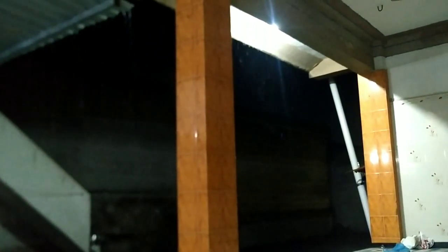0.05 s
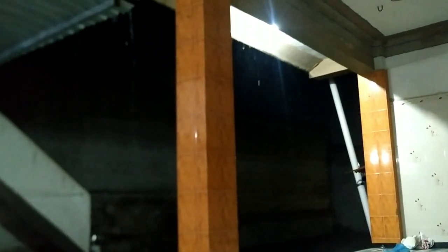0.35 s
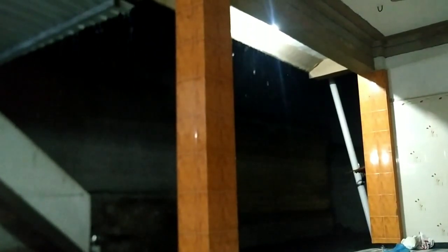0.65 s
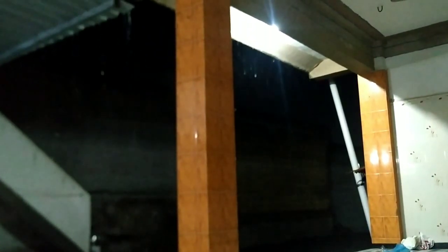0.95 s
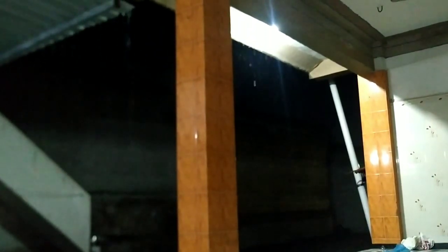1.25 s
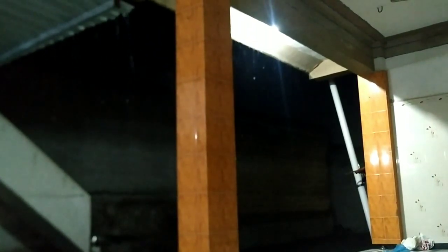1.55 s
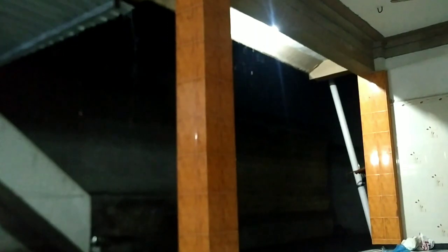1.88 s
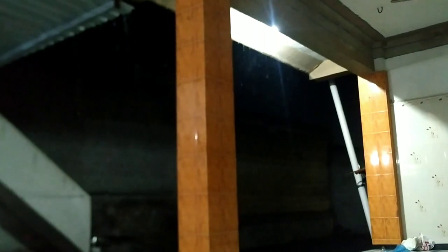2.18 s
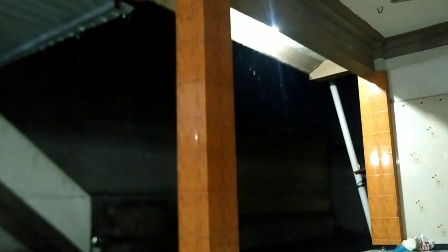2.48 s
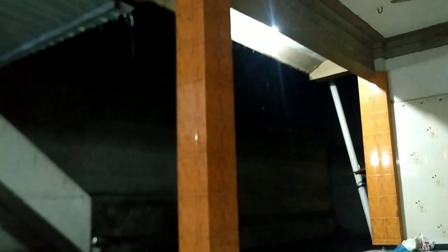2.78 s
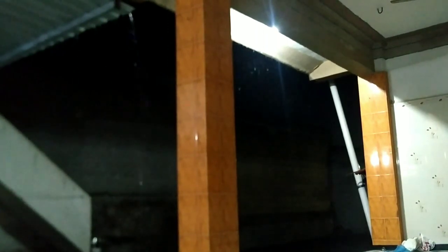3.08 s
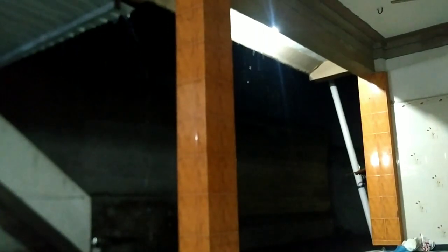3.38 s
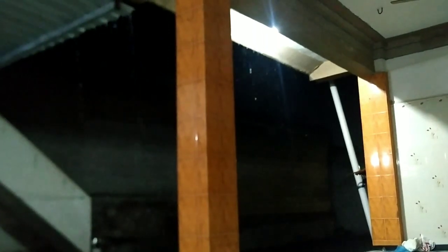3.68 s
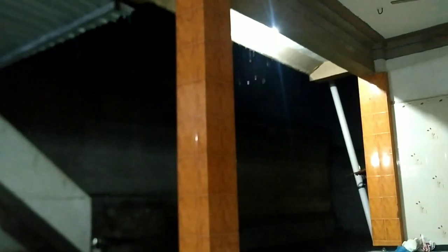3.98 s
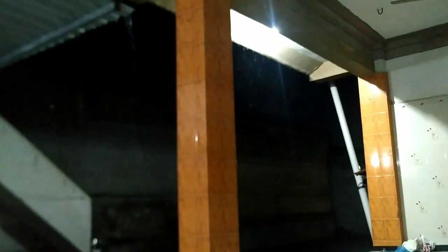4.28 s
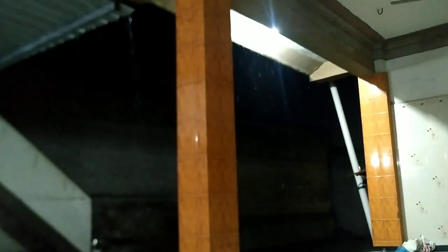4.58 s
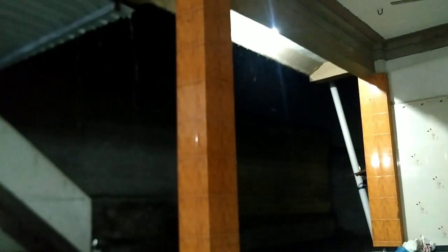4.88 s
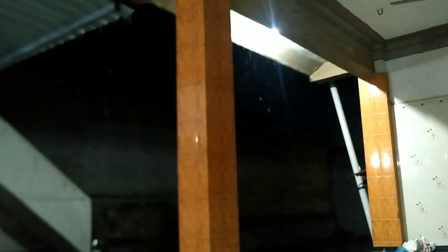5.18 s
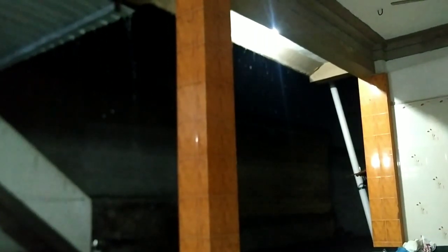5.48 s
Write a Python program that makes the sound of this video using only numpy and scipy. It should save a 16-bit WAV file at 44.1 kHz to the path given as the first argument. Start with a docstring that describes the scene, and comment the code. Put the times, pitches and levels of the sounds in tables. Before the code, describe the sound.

Heavy rain falls throughout on a flooded paved yard, heard from under the porch of a house. A bright, bubbling sizzle sits mostly to the left, while separate drips stand out on the right. Water off the eaves lands in short gushes, with tiny squeaky chirps on both sides. Rain on the surrounding roofs makes a dull roar with a faint low drone. The downpour eases slightly, then picks up again.

```python
"""A flooded paved yard in heavy rain, heard from under the porch of a house.
Countless drops burst on the wet paving and trap ringing bubbles: a bright sizzle, mostly to the left.
Water spilling off the eaves lands in gushes. Brief, squeaky narrow-band chirps sound on either side.
Impacts on the roofs all around merge into a roar, in which hollow surfaces briefly resonate,
and a low drone swells now and then beneath it."""
import sys
import numpy as np
from scipy import signal
from scipy.fft import rfft, irfft
from scipy.io import wavfile

SR = 44100
rng = np.random.default_rng(int(sys.argv[2]) if len(sys.argv) > 2 else 0)


def generate_wav(sig):
    """Save sig (samples, or channels by samples) to the path in sys.argv[1] as 16-bit PCM at SR."""
    pcm = np.round(np.clip(np.atleast_2d(sig).T, -1, 1) * 32767).astype(np.int16)
    wavfile.write(sys.argv[1], SR, pcm)


N = 249165
TIME = np.arange(N) / SR
FREQS = np.maximum(np.arange(N // 2 + 1) * SR / N, 1)


def from_db(db):
    """Amplitude ratio of a level in decibels."""
    return 10 ** (np.asarray(db) / 20)


def rms_one(x):
    """Normalisation to an rms of one."""
    return x / np.sqrt(np.mean(x ** 2) + 1e-20)


def over_freqs(rows):
    """Interpolation of a table's columns along a log-frequency axis."""
    hz, *columns = np.transpose(rows)
    return np.array([np.interp(np.log(FREQS), np.log(hz), c) for c in columns])


def colour(sound, gain):
    """Linear filtering: the spectrum is multiplied by a gain at each frequency."""
    return irfft(rfft(sound) * gain, N)


def density(rows):
    """Gains that give white noise of rms one a tabulated power spectral density."""
    return from_db(over_freqs(rows)) * np.sqrt(SR / 2)


def drift(rate_hz):
    """Slow random fluctuation: low-passed noise of rms one."""
    return rms_one(colour(rng.standard_normal(N), 1 / (1 + (FREQS / rate_hz) ** 2)))


def swell(peak_s, half_length_s):
    """A raised-cosine envelope."""
    return np.cos(np.pi / 2 * np.clip((TIME - peak_s) / half_length_s, -1, 1)) ** 2


def place(start_s, sounds):
    """Superposition of short sounds at their start times."""
    at = (start_s * SR).astype(int)[:, None] + np.arange(sounds.shape[1])
    return np.bincount(at.ravel() % N, sounds.ravel(), N)


def narrow_bursts(hz, width_hz, rise_s, fall_s, samples=4096):
    """Noise-excited resonance: for each pitch, a burst of noise rings in a narrow band."""
    age = np.arange(samples) / SR
    envelope = np.minimum(age / rise_s, 1) * np.exp(-np.maximum(age - rise_s, 0) / fall_s)
    detuning_hz = np.arange(samples // 2 + 1) * SR / samples - hz[:, None]
    resonance = 1 / (1 + 2j * detuning_hz / width_hz) ** 2
    bursts = irfft(rfft(envelope * rng.standard_normal((len(hz), samples))) * resonance)
    return bursts * np.sqrt(np.sum(envelope ** 2) / np.sum(bursts ** 2, axis=1, keepdims=True))


def splash(flutter_db=0.34, patchy_db=0.8):
    """Incoherent sources add in power: spray, drops, bubbles and gushes sizzle on the paving."""
    # spectrum of drops bursting on wet paving: frequency_hz, left_db_per_hz, right_db_per_hz
    spectrum = [(960, -82, -80), (1800, -67.5, -59), (2060, -64, -62), (3100, -59.5, -60),
                (3260, -60.5, -61), (4230, -60, -66.5), (5000, -59, -67.5), (5500, -60, -71.5),
                (7200, -58.5, -71.5), (9500, -59.5, -71), (10800, -62.5, -73.5), (12600, -67.5, -82),
                (14000, -73.5, -79), (15000, -96, -92)]
    # dripping on the right, heaviest at first: time_s, level_db
    dripping = [(0, 2), (0.2, 9), (0.65, 1.5), (0.97, 5), (1.3, -2), (2.4, 3), (3.3, -3), (5.65, 1)]
    sizzle = (from_db(-3) * rng.standard_normal((2, N))  # fine spray
              + from_db(-2.5) * impacts(per_s=7000, spread_db=1.5)  # dense drops
              + from_db(-12) * impacts(per_s=410, spread_db=2.5)  # sharper, near drops
              + from_db(-9.5) * bubbles(per_s=650, cycles=1130, spread_db=-1.1))
    left_drips = patter(per_s=170, low_hz=2203, high_hz=7987, spread_db=11.5, width_hz=63)
    right_drips = patter(per_s=280, low_hz=3360, high_hz=13260, spread_db=9, width_hz=110)
    drip_db = np.interp(TIME, *np.transpose(dripping))
    left = sizzle[0] + from_db(-11) * left_drips
    # less sizzle reaches the right side, so separate drips stand out there
    right = from_db(-1) * sizzle[1] + from_db(drip_db - 12) * right_drips
    steady, coarse = rfft([[left, right], gush_spray()]) * density(spectrum)
    common_db = flutter_db * drift(14)
    centres_hz = np.geomspace(1500, 13000, 13)
    out = np.zeros((2, N))
    for hz, selector in zip(centres_hz, np.eye(len(centres_hz))):
        band = np.interp(np.log(FREQS), np.log(centres_hz), selector)
        # the mix of drop sizes keeps changing, so each band flickers a little on its own
        out += irfft(steady * band, N) * from_db(common_db + patchy_db * drift(10))
        out += irfft(coarse * band, N) * np.sqrt(gush_power(hz))
    return out


def impacts(per_s, spread_db):
    """Shot noise: drops of uneven size strike at random, independently on each side; rms one."""
    strikes = rng.random((2, N)) < per_s / SR
    sizes = from_db(spread_db * np.minimum(rng.exponential(1, (2, N)), 4))
    return rms_one(strikes * sizes * rng.choice([-1, 1], (2, N)))


def bubbles(per_s, cycles, spread_db, rise=0.052, samples=1800):
    """Bubble resonance: air trapped by a drop rings, rising in pitch as it nears the surface."""
    when, pitch, chance, side = rng.random((int(per_s * N / SR), 4)).T[:, :, None]
    hz = 2000 * 6 ** pitch
    turns = hz * np.arange(samples) / SR
    amplitude = hz * from_db(spread_db * np.minimum(-np.log(1 - chance), 4))
    damping = from_db(-60 * turns / cycles)
    surfacing = 1 - np.linspace(0, 1, samples) ** 4  # fades the longest rings
    ring = amplitude * damping * surfacing * np.sin(2 * np.pi * turns * (1 + rise * turns / cycles))
    at = (when * N).astype(int) + np.arange(samples)
    lags = (0, (28 * side - 14).astype(int))  # arrival times differ between the two sides
    return rms_one(np.array([np.bincount((at + lag).ravel() % N, ring.ravel(), N) for lag in lags]))


def patter(per_s, low_hz, high_hz, spread_db, width_hz):
    """A random pulse train: separate drips ring briefly, each at its own pitch; rms one."""
    when, pitch, strength = rng.random((int(per_s * N / SR), 3)).T
    bursts = narrow_bursts(low_hz * (high_hz / low_hz) ** pitch, width_hz, rise_s=0.002, fall_s=0.015)
    return rms_one(place(when * N / SR, bursts * from_db(spread_db * strength)[:, None]))


def gush_spray():
    """Fragmentation: a gush breaks into coarse drops and heavily damped bubbles; rms one."""
    drops = impacts(per_s=1800, spread_db=-1)
    return rms_one(drops + 0.44 * bubbles(per_s=900, cycles=45, spread_db=2, samples=900))


def gush_power(hz, rise_s=0.0083, fall_s=0.037, width_octaves=0.26):
    """Exponential growth and decay of power in one band: a gush lands fast and settles more slowly."""
    # gushes off the eaves: landing_s, level_db (relative to the steady splash), brightest_hz
    gushes = [(0.04, -5, 3500), (0.163, -3, 7440), (0.2, -8, 9500), (0.525, 0, 5440), (1.045, 2, 11500),
              (1.12, -1, 10000), (1.767, 0, 2900), (2.29, 2, 6500), (2.925, 6, 12500), (2.985, 1, 10000),
              (3.455, 3, 9500), (3.781, 4.5, 7400), (4.481, 3, 7200), (5.186, 4.5, 4700)]
    power = np.zeros(N)
    for landing_s, db, brightest_hz in gushes:
        near = abs(TIME - landing_s) < 0.25
        age = TIME[near] - landing_s
        envelope = np.exp(-np.maximum(-age - rise_s / 2, 0) / rise_s - np.maximum(age, 0) / fall_s)
        band_weight = np.exp(-0.5 * (np.log2(hz / brightest_hz) / width_octaves) ** 2)
        power[near] += from_db(db) ** 2 * envelope * band_weight
    return power


def chirps(lead_s=0.007):
    """Narrow-band noise: brief, squeaky chirps, each at its own pitch, most louder on one side."""
    # squeaky chirps: time_s, pitch_hz, left_db, right_db
    squeaks = [(0.039, 4480, -43, -32), (0.148, 5510, -36, -25), (0.168, 4740, -40, -32),
               (0.172, 6600, -38, -30), (0.232, 6000, -42, -35), (0.322, 3350, -23, -25),
               (0.351, 5000, -42, -27), (0.383, 5770, -30, -44), (0.48, 9550, -31, -31),
               (0.956, 4700, -38, -29), (1.048, 2230, -29, -38), (1.048, 6550, -25, -42),
               (1.138, 3530, -25, -40), (1.383, 1895, -27, -31), (1.515, 3130, -26, -40),
               (1.6, 3100, -30, -40), (1.63, 9200, -40, -34), (1.77, 2930, -24, -38),
               (1.81, 8300, -42, -29), (1.9, 5170, -42, -33), (2.235, 2450, -28, -40),
               (2.322, 7235, -26, -40), (2.329, 4100, -42, -28), (2.916, 11370, -32, -34),
               (2.933, 8200, -38, -27), (3.08, 10000, -38, -33), (3.13, 5426, -42, -31),
               (3.772, 8096, -38, -31), (4.49, 5500, -32, -33), (4.65, 7924, -38, -32)]
    time_s, hz, *sides_db = np.transpose(squeaks)
    sides = []
    for db in sides_db:
        bursts = narrow_bursts(hz, width_hz=420, rise_s=0.0098, fall_s=0.027)
        sides.append(place(time_s - lead_s, from_db(db)[:, None] * bursts))
    return np.array(sides)


def plinks(decay_s=0.00057, right_db=-9):
    """Damped oscillation: fat drops land near the left side with a very short, high ring."""
    # single fat drops: start_s, level_db, pitch_hz
    drops = [(0.1567, -8, 7400), (0.249, -9, 7000), (1.738, -6, 7270), (2.9117, -2, 10400),
             (3.766, -7, 6300), (3.7878, -7, 7960)]
    out = np.zeros(N)
    for start_s, db, hz in drops:
        age = np.maximum(TIME - start_s, 0)
        out += from_db(db) * np.exp(-np.minimum(age / decay_s, 50)) * np.sin(2 * np.pi * hz * age)
    return out * from_db([[0], [right_db]])


def roof_roar(flutter_db=0.39):
    """Dense shot noise: so many far drops drum on the roofs that they merge into one dull rush."""
    # spectrum of rain on the roofs: frequency_hz, level_db_per_hz
    spectrum = [(20, -78), (36, -61.5), (52, -76), (75, -59.5), (140, -59.5), (215, -62.5), (340, -57.5),
                (520, -55), (880, -54), (970, -52), (1090, -55), (1330, -54.5), (1600, -60), (3000, -73)]
    # the two sides are alike only in the bass: frequency_hz, correlation
    likeness = [(100, 1), (250, 0.84), (480, 0.75), (800, 0.44), (1100, 0.055), (1500, -0.33),
                (2200, -0.15)]
    mid, side = impacts(per_s=14000, spread_db=2.5)
    correlation = np.clip(over_freqs(likeness)[0], -0.99, 0.99)
    in_phase = colour(mid, np.sqrt((1 + correlation) / 2))
    antiphase = colour(side, np.sqrt((1 - correlation) / 2)) * [[1], [-1]]
    return colour(in_phase + antiphase, density(spectrum)) * from_db(flutter_db * drift(18))


def hollows(width_hz=75):
    """Forced vibration: drumming water briefly drives hollow surfaces at their resonances."""
    # hollow resonances in the roar: peak_s, half_length_s, pitch_hz, level_db
    resonances = [(1.25, 0.3, 248, -40), (1.638, 0.14, 380, -33.5), (1.943, 0.35, 855, -34),
                  (2.453, 0.36, 333, -40), (2.55, 1, 980, -36), (2.75, 0.17, 537, -33),
                  (4.697, 0.32, 1030, -35), (4.72, 0.25, 700, -39.5), (5.55, 0.4, 880, -33)]
    out = np.zeros(N)
    for peak_s, half_length_s, hz, db in resonances:
        response = 1 / (1 + (2 * (FREQS - hz) / width_hz) ** 2)
        ring = rms_one(colour(rng.standard_normal(N), response))
        out += from_db(db) * swell(peak_s, half_length_s) * ring
    return out


def drone(waver_hz=4.1):
    """Random frequency modulation: low tones waver as they swell out of the roar and sink back."""
    # swells of the drone: peak_s, half_length_s, pitch_hz, relative_level_db
    tones = [(.42, 0.66, 123, -37), (1.117, 0.74, 74.8, -38), (1.725, 0.26, 122.8, -36),
             (2.4, 0.38, 135, -43), (3.45, 0.62, 107.5, -36), (3.95, 0.3, 118, -37),
             (5.334, 0.34, 122.4, -37)]
    out = np.zeros(N)
    for peak_s, half_length_s, hz, db in tones:
        phase = 2 * np.pi * np.cumsum(hz + waver_hz * drift(9.7)) / SR
        out += from_db(db) * swell(peak_s, half_length_s) ** 2 * np.sqrt(2) * np.sin(phase)
    return out


def scene(crossover_hz=700, deep_follows=0.68, splash_follows=0.6):
    """Superposition of the near yard and the far roofs, each rising and falling with the rain."""
    # the downpour eases into a lull, then picks up again: time_s, strength_db
    rain = [(0, 1.5), (0.65, 0.4), (1.05, 1), (1.4, -0.2), (2.7, -1), (3.75, -2.2), (4.3, -1.9),
            (4.7, -0.5), (5.0, -1), (5.65, -0.6)]
    # the drumming on the roofs follows its own course: time_s, strength_db
    drumming = [(0, 1), (1.1, 0.6), (1.45, 0), (2.0, 0), (2.5, 0), (2.95, 0), (3.3, 0), (3.8, -1.7),
                (4.3, -0.8), (4.68, -0.4), (5.0, 0), (5.65, 0)]
    rain_db = np.interp(TIME, *np.transpose(rain))
    roof_db = np.interp(TIME, *np.transpose(drumming))
    roar = roof_roar()
    # the deep rush is steadier than the ring above it
    deep = colour(roar, 1 / (1 + (FREQS / crossover_hz) ** 6))
    roofs = from_db(0.47 + deep_follows * roof_db) * deep + from_db(roof_db) * (roar - deep)
    yard = from_db(splash_follows * rain_db) * splash() + plinks()
    return yard + chirps() + roofs + from_db(-2.5) * drone() + hollows()


def record(dry):
    """An elliptic low-pass filter cuts the highest treble steeply."""
    return signal.sosfilt(signal.ellip(16, 0.1, 90, 15450, fs=SR, output="sos"), dry)


dry = scene()
out = record(dry)
generate_wav(out)
```